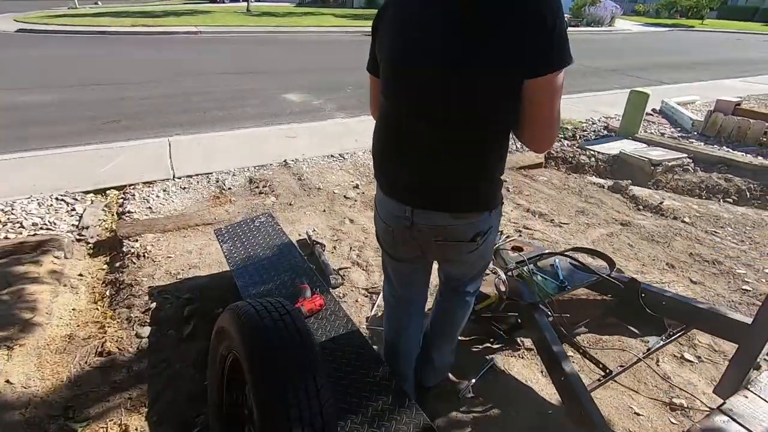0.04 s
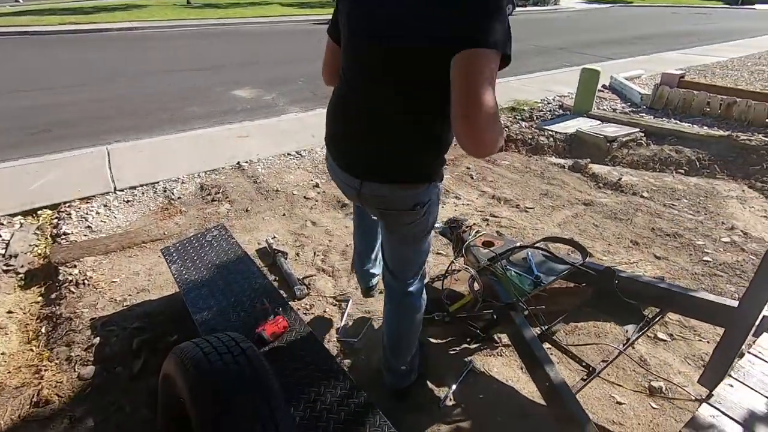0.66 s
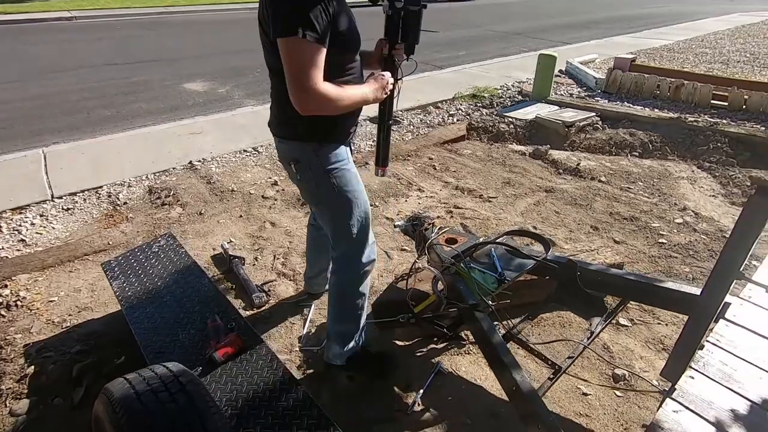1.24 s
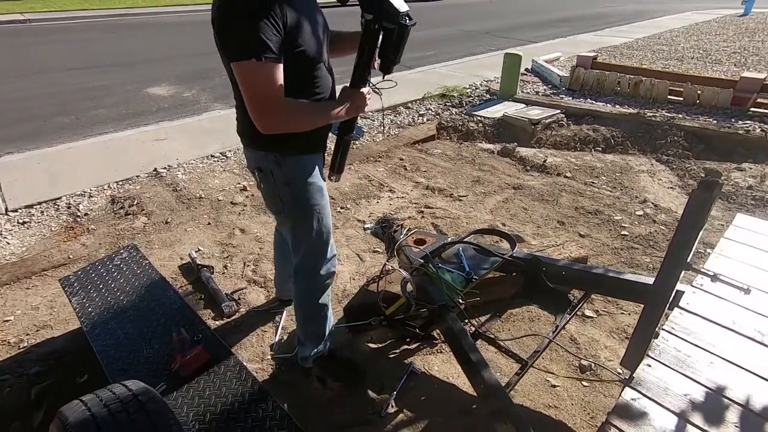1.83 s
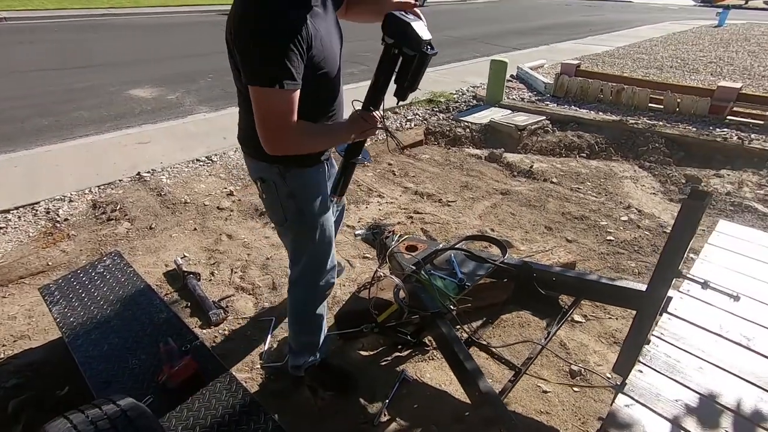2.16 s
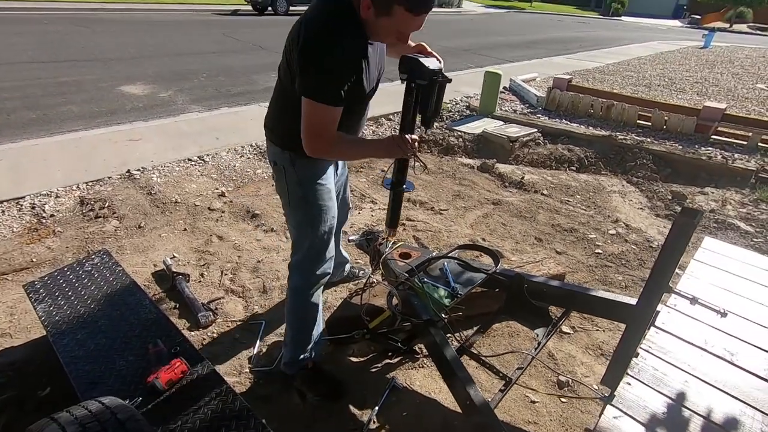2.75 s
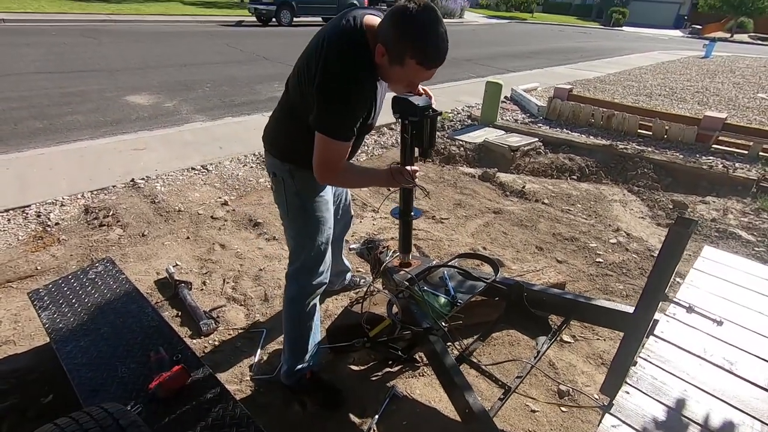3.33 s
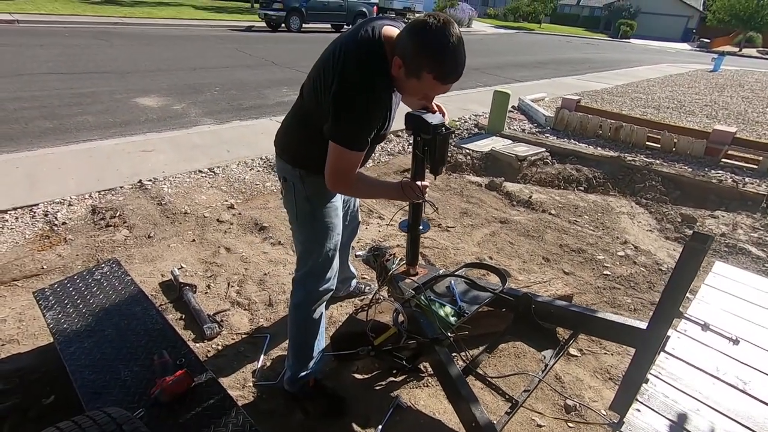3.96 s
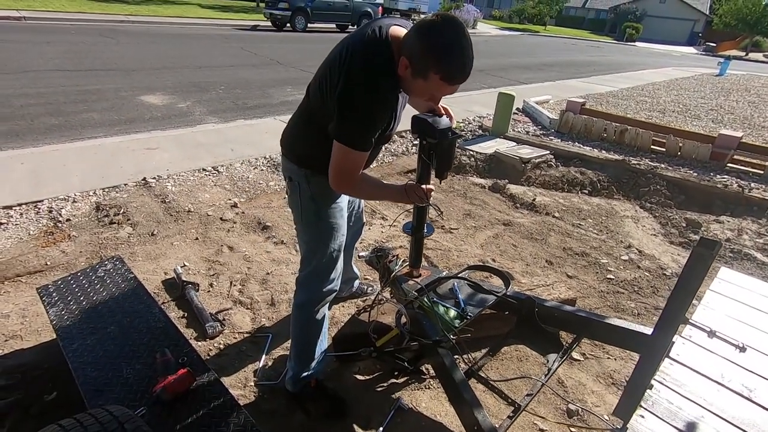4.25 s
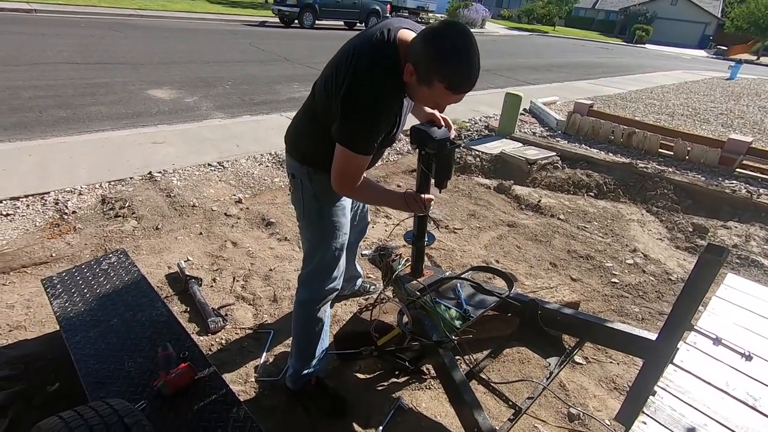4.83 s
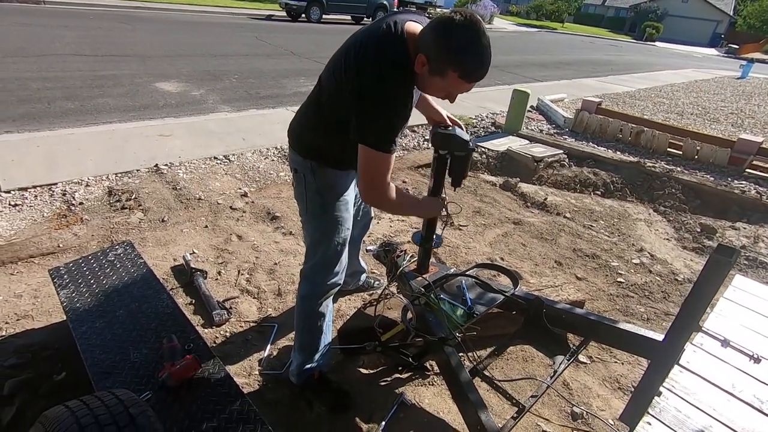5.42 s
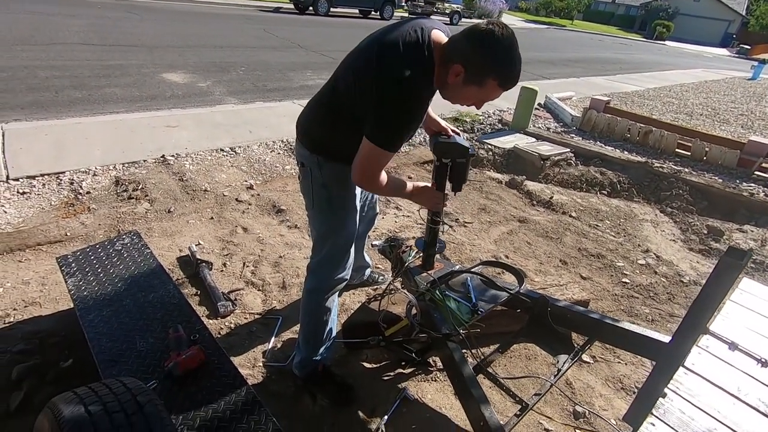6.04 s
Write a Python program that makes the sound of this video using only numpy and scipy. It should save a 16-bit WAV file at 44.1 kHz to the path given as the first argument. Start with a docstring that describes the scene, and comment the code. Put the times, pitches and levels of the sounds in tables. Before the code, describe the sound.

For the first second and a half, shoes scuff softly on dry, gritty dirt close to the microphone, with a few dull taps. A gust of wind bumps the microphone with a low rumble at about 1 second. The loose fittings of a steel trailer jack tick at 1.7 seconds, and another scuff and a few light clinks follow around 2.5 seconds. The jack's tube knocks against the trailer frame at 3.7 and 4.4 seconds, then gives a sharper double clank at 4.75. A knock and a short scrape come at 5.3 seconds, and at 5.6 the tube drops into place with a loud, rattling clank and a brief, thin ring. A last small scrape and tap follow just after 6 seconds. Faint distant traffic and a low motor hum continue throughout in the open yard.

```python
"""Shoes scuff grit close to the microphone as a man carries a steel trailer jack over a dirt yard.
Loose fittings tick. He works the jack's tube into the hole of a trailer tongue: it knocks on rim
and wall, scrapes, and drops home with a clank, tube and tongue ringing together.
Far off are traffic, a humming motor and a thin whine; a light wind rocks the microphone."""
import sys
import numpy as np
from scipy import signal
from scipy.fft import rfft, irfft
from scipy.io import wavfile
from scipy.ndimage import uniform_filter1d, map_coordinates

SR = 44100
rng = np.random.default_rng(int(sys.argv[2]) if len(sys.argv) > 2 else 0)


def store_wav(level_fs):
    """Save 16-bit WAV to argv[1]."""
    pcm = np.round(np.clip(np.atleast_2d(level_fs), -1, 1) * 32767)
    wavfile.write(sys.argv[1], SR, pcm.T.astype(np.int16))


N = 272670
TIME = np.arange(N) / SR


def from_db(db):
    """Decibels to gain."""
    return 10 ** (np.asarray(db) / 20)


def rms_one(x):
    """Scale to unit rms."""
    return x / np.sqrt(np.mean(x ** 2) + 1e-20)


def at_hz(table, hz, column=1):
    """Read a column of a table on a log-frequency axis."""
    table = np.array(table)
    return np.interp(np.log(hz + 1e-9), np.log(table[:, 0]), table[:, column])


def coloured(x, spectrum):
    """Filter a steady signal by rows of (f/Hz, level/dB); rms 1."""
    gain = from_db(at_hz(spectrum, np.fft.rfftfreq(N, 1 / SR)))
    return rms_one(irfft(rfft(x) * gain, N))


def drift(knots_per_s):
    """A smooth random curve of rms 1."""
    knots = rng.standard_normal(2048)
    return rms_one(map_coordinates(knots, [TIME * knots_per_s], order=2, mode="wrap"))


def band(x, low, high, order=2):
    """Causal band-pass, edges in Hz."""
    edges = [low, min(high, SR / 2 - 100)]
    return signal.sosfilt(signal.butter(order, edges, "band", fs=SR, output="sos"), x)


def add(out, at_s, sound):
    """Mix a sound in at the given time."""
    start = int(at_s * SR)
    out[start:start + len(sound)] += sound[:N - start]


def swells(rows, release=1.0):
    """Gain over time: each row grows exponentially to its peak and fades `release` times as slowly."""
    power = 0
    for peak_s, db, swell_s in rows:
        away = np.maximum(peak_s - TIME, (TIME - peak_s) / release) / swell_s
        power = power + (from_db(db) * np.exp(-np.minimum(away, 20))) ** 2
    return np.sqrt(power)


def dying_noise(db_at, t60_at, seconds):
    """Third-octave bands of noise, each dying at its own rate."""
    t = TIME[:int(seconds * SR)]
    edges = 70 * 2 ** (np.arange(25) / 3)
    white, out = rng.standard_normal((2, len(t))), 0
    for k, (low, high) in enumerate(zip(edges, edges[1:])):
        hz = np.sqrt(low * high)
        fade = from_db(-60 * t / t60_at(hz))
        band_rms = np.sqrt(np.mean(fade ** 2) * 2 * (high - low) / SR)
        out = out + from_db(db_at(hz)) * band_rms * rms_one(band(white[k % 2] * fade, low, high))
    return out


def ringing(modes, spread_db=1):
    """One blow on modes of (f/Hz, level/dB, t60/s), each caught with its own strength and sign."""
    t = TIME[:SR // 2]
    hz, db, t60 = np.transpose(modes)[:, :, None]
    strength = from_db(db + spread_db * rng.standard_normal(hz.shape)) * rng.choice([-1, 1], hz.shape)
    return np.sum(strength * from_db(-60 * t / t60) * np.sin(2 * np.pi * hz * t), axis=0)


def far_traffic(level_db=-62):
    """Distant streets merge into a wash whose level wanders slightly."""
    # spectrum of the wash: f/Hz, level/dB per Hz
    spectrum = [(40, -5), (60, -11), (90, -10.5), (125, -6.5), (160, -7.5), (250, -14.5), (330, -10.5),
                (480, -16), (700, -14), (1050, -21), (1650, -24.5), (3700, -31.5), (5700, -33.5),
                (9000, -39.5), (15500, -43)]
    return from_db(level_db + .5 * drift(3.28)) * coloured(rng.standard_normal(N), spectrum)


def far_motor():
    """A distant motor hums, each partial wavering in level and pitch."""
    # partials of the hum: f/Hz, level/dB rms, waver/Hz
    partials = [(115.8, -62, 0.947), (232, -76.5, 2.72), (347.8, -68, 1.1), (638, -77.5, 2.0)]
    hum = 0
    for hz, db, waver_hz in partials:
        amplitude = np.sqrt(2) * from_db(db + 1.2 * drift(6))
        phase = 2 * np.pi * np.cumsum(hz + waver_hz * drift(8)) / SR
        hum = hum + amplitude * np.sin(phase)
    return hum


def far_whine(hz=5650, width_hz=90):
    """A thin, distant band of noise swells and fades."""
    # height of the whine: t/s, level/dB, swell/s
    peaks = [(4.1, -81.5, 1.9)]
    whine = band(rng.standard_normal(N), hz - width_hz / 2, hz + width_hz / 2, order=1)
    return swells(peaks, release=0.69) * rms_one(whine)


def wind_on_microphone(breeze_db=-65, sway_db=-37.5, sway_follows=.58, sway_average_s=0.65):
    """Moving air drives a lumpy rumble and, more sluggishly, pressure swings below hearing."""
    # gusts at their height: t/s, level/dB, swell/s
    gusts = [(.02, -50.5, 0.021), (.22, -47.5, .04), (.45, -48, 0.28), (.81, -34.5, .035),
             (.98, -28, 0.024), (1.07, -41.5, 0.053), (1.2, -44.5, .035), (2.09, -43.5, 0.049),
             (3.0, -53, 0.08), (3.33, -43.5, 0.07), (3.7, -53.5, 0.16), (4.1, -54.5, 0.07),
             (6.18, -49, 0.12)]
    # spectrum of the rumble: f/Hz, level/dB per Hz
    spectrum = [(14, -3.5), (25, 8), (45, -2.5), (62, -8), (90, -16.5), (160, -29), (300, -74)]
    strength = np.hypot(from_db(breeze_db), swells(gusts, release=1.33))
    over_breeze = strength / from_db(breeze_db)
    gustiness = uniform_filter1d(over_breeze ** sway_follows, int(sway_average_s * SR) + 1)
    sway = rms_one(band(rng.standard_normal(N + SR), 2.5, 8, order=3)[SR:])
    rumble = coloured(rng.standard_normal(N), [(3.3, -35)] + spectrum)
    return from_db(sway_db) * gustiness * sway + strength * rumble


def yard_reflections(near, delay_s=.022, send_db=-30):
    """Ground, fence and houses scatter a weak, dull tail back to the microphone."""
    # scatter of the yard: f/Hz, relative level/dB, t60/s
    scatter = [(100, -7, .7), (300, -10, .65), (800, -17, .6), (2000, -27, .5), (4500, -29, .5),
               (8000, -35, .35), (15000, -39, .3)]
    tail = dying_noise(lambda hz: at_hz(scatter, hz), lambda hz: at_hz(scatter, hz, column=2), 1.0)
    out = np.zeros(N)
    add(out, delay_s, from_db(send_db) * signal.fftconvolve(near, tail)[:N])
    return out


def friction(push, spectrum, slips_per_s, size_db, clump_db):
    """Many tiny slips of uneven size, bunched in clumps, as loud as the push behind them."""
    slips = (rng.random(N) < slips_per_s / SR) * rng.choice([-1, 1], N)
    sizes = from_db(size_db * np.minimum(rng.exponential(1, N), 4))
    clumps = from_db(clump_db * drift(130))
    return coloured(slips * sizes * clumps, spectrum) * push


def shoe_scuffs(gain_db=1.0):
    """Soles drag over dry dirt near the microphone, and the grit slips under them."""
    # hardest push of each scuff: t/s, relative level/dB, swell/s
    scuffs = [(.02, -60.5, .03), (.115, -61.5, 0.028), (.225, -63.5, 0.044), (.48, -64, 0.21),
              (.885, -59.5, 0.023), (.98, -60, 0.075), (1.065, -55.5, 0.087), (1.25, -66, 0.24),
              (1.455, -65, 0.011), (2.40, -63.5, 0.097), (2.452, -48, 0.026)]
    # spectrum of the grit: f/Hz, level/dB per Hz
    grit = [(150, -4.5), (400, -6), (750, -3.5), (1100, -4), (1800, -8), (4300, -16.5), (6700, -23),
            (9000, -22), (11000, -32), (15500, -42)]
    push = from_db(gain_db) * swells(scuffs, release=0.91)
    return friction(push, grit, slips_per_s=2400, size_db=2.0, clump_db=1.5)


def dull_taps(ground_db=-7, ground_delay_s=.005, crumble=0.15, crumble_s=0.004):
    """Dead contacts close by: one push, a little crumbling, and a reflection from the ground."""
    # short contacts: t/s, level/dB before the band-pass, centre f/Hz
    contacts = [(.119, -25, 745), (0.2257, -19.5, 990), (0.2883, -29.5, 1210), (.529, -39, 2200),
                (.639, -41.5, 2000), (1.052, -37, 1090), (1.069, -33, 1010), (2.248, -28, 880),
                (2.457, -46, 5030), (2.483, -31, 1490), (2.493, -30, 1380), (4.4298, -24.5, 1370),
                (5.221, -26, 1200), (5.2577, -27.5, 1370), (5.289, -32, 900), (5.5766, -8, 2160),
                (6.103, -23.5, 766)]
    out, t = np.zeros(N), TIME[:SR // 10]
    for at_s, db, hz in contacts:
        envelope = np.exp(-t / crumble_s) * (1 - np.exp(-t * hz / 2))
        force = crumble * rng.standard_normal(len(t)) * envelope
        force[0] += 2   # the push itself
        tap = from_db(db) * band(force, hz * .5, hz * 1.65, order=3)
        add(out, at_s, tap)
        add(out, at_s + ground_delay_s, from_db(ground_db) * tap)
    return out


def fitting_ticks(focus_db_per_octave=18, crack_db=2, crack_s=0.0018, rise_s=0.00073):
    """The jack's loose fittings touch: a tiny crack, and modes near the struck pitch ring most."""
    # touches: t/s, level/dB, f/Hz struck hardest, t60/s of damping by what the fitting rests on
    touches = [(1.612, -61, 8000, .03), (1.668, -43.5, 2070, 0.018), (1.668, -46, 3440, 0.013),
               (1.668, -55, 7700, .04), (2.326, -58, 6700, .4), (2.523, -44, 6960, 0.19),
               (2.522, -44, 3000, 0.065), (2.540, -55, 8450, 0.11), (2.630, -54, 2800, 0.069),
               (2.630, -56, 7000, 0.061), (2.847, -52, 5500, .02), (4.583, -53.5, 7600, 0.15),
               (5.604, -42.5, 8750, 1.5), (5.679, -50.5, 5900, 1.8), (6.113, -47, 8000, .05)]
    # modes of a fitting: f/Hz, relative level/dB, t60/s
    fitting = [(1910, 2, 0.022), (2490, -3, 0.12), (5760, -18.5, 0.5), (6880, -16, 0.11), (8200, -5, 0.018),
               (8130, -18, 0.25), (8800, -17, 0.38), (9850, -17, .28)]
    out, t = np.zeros(N), TIME[:SR // 2]
    for at_s, db, struck_hz, damping_t60 in touches:
        modes = [(hz, mode_db - focus_db_per_octave * abs(np.log2(hz / struck_hz)), t60)
                 for hz, mode_db, t60 in fitting]
        ring = ringing(modes) * from_db(-60 * t / damping_t60)
        burst = rng.standard_normal(len(t)) * np.exp(-t / crack_s)
        crack = from_db(crack_db) * band(burst, struck_hz * 0.66, struck_hz * 1.23)
        add(out, at_s, from_db(db) * (ring + crack) * (1 - np.exp(-t / rise_s)))
    return out


def tube_scrapes():
    """Steel rasps on steel as the tube slides in the hole."""
    # hardest push of each slide: t/s, level/dB, swell/s
    slides = [(5.29, -59.5, 0.054), (5.775, -66, 0.033), (6.113, -51, 0.016), (6.17, -57, 0.042)]
    # spectrum of the rasp: f/Hz, level/dB per Hz
    rasp = [(200, -1), (600, -1), (2300, -9.5), (4400, -10.5), (8500, -14.5), (11000, -20), (15500, -27)]
    return friction(swells(slides), rasp, slips_per_s=3800, size_db=-2.0, clump_db=2.1)


def tube_knocks(grip_t60=0.3):
    """Close up, each knock shakes the frame and rings the steel by where it lands; hands damp the ring."""
    # tube against tongue: t/s, place, contact level/dB at 800 Hz, relative to that thud/dB, clang/dB
    # and edge/dB; then frame t60/s, ring level/dB, rise/s
    blows = [(3.6572, "rim", -26, 0, -13, -39, 0.088, -50.5, 0.001),
             (3.6609, "rim", -27, -3, -3.5, -20, .14, -58, 0.00068),
             (3.6762, "wall", -42, 11.5, -19, -35, 0.11, -69, .0007),
             (4.4276, "rim", -29.5, 0.5, -18, -25, 0.1, -49, 0.00023),
             (4.746, "wall", -18, -0.5, -34, -24, 0.046, -70, 0.0018),
             (4.7512, "wall", -23, 2, 3.5, -4, 0.1, -39, 0.0018),
             (4.7739, "wall", -27, -7, 4.5, -0.5, 0.15, -37.5, 0.00044),
             (5.3021, "rim", -28, 4, -2.5, -20.5, 0.13, -45.5, 0.00054),
             (5.3185, "rim", -34.5, -18, -33, -8.5, 0.11, -70, 0.0013),
             (5.5662, "seat", -36, -20, -12, -1, 0.056, -48.5, 0.0019),
             (5.5737, "seat", -18, 0, 1.5, -8, 0.09, -36, 0.00037),
             (5.5910, "seat", -27.5, -3, 6.5, -5.5, 0.15, -43.5, 0.00053),
             (5.6065, "seat", -27.5, 6, 0.5, -16, 0.14, -71, 0.00084)]
    # the frame's countless close modes: f/Hz, relative level/dB, factor on the blow's t60
    frame_modes = [(73.4, -4.5, 1.5), (128, -9, 4.4), (244, -2.5, 2.1), (480, -5.5, 2.3), (720, 0, 1.27),
                   (1400, -3.5, 1.04), (2400, -6.5, 1.04), (3750, -2.5, 0.86), (5160, -5, 0.92),
                   (8200, -3, 0.69), (11400, -17.5, 0.66), (15000, -26, 0.87)]
    # modes of tube and tongue together: f/Hz, t60/s, relative level/dB struck on rim, wall, seat
    steel_modes = [(184, .3, -16, -8, -16), (236, .25, -16, -3, -12), (248, .33, -16, 3, -9),
                   (637, .22, -1, -10, -10), (657, .25, -14, -12, -2), (802, .2, -2, -6, 0),
                   (913, .2, -14, -20, -5), (1055, .22, -12, -14, -2), (1320, .18, -10, -4, -6),
                   (1480, .15, -14, -1, -8), (1745, .19, -16, -8, 4), (1965, .18, -9, -8, -6),
                   (2048, .15, -3, -16, -12), (2096, .17, -14, -14, 1), (2140, .15, -6, -14, -9),
                   (2309, .15, -8, -14, -4), (2417, .14, -9, -4, -12), (2514, .14, -12, -1, -4),
                   (2847, .13, -3, -20, -20), (2900, .17, -18, -6, -8), (3418, .16, -10, -16, -8),
                   (3812, .12, -14, -4, -3), (3984, .12, -14, -1, -4), (4172, .12, -20, 1, -2),
                   (4408, .15, -14, -5, -7), (5124, .12, -26, -6, -12), (5412, .13, -26, -4, -6),
                   (5589, .15, -26, -11, -4), (6166, .15, -28, -14, -7), (7900, .11, -28, -11, -18),
                   (8190, .1, -28, -11, -16)]
    # parts of the hole, in the order of those columns
    places = ["rim", "wall", "seat"]
    out, t = np.zeros(N), TIME[:SR // 2]
    for at_s, place, db, thud_db, clang_db, edge_db, t60, ring_db, rise_s in blows:
        contact = [(250, thud_db), (800, 0), (3000, clang_db), (9000, edge_db)]   # f/Hz, level/dB
        frame = dying_noise(lambda hz: db + at_hz(contact, hz) + at_hz(frame_modes, hz),
                            lambda hz: t60 * at_hz(frame_modes, hz, column=2), seconds=.5)
        modes = [(hz, ring_db + place_db[places.index(place)], mode_t60)
                 for hz, mode_t60, *place_db in steel_modes]
        ring = ringing(modes) * from_db(-60 * t / grip_t60)
        add(out, at_s, (frame + ring) * (1 - np.exp(-t / rise_s)))
    return out


def scene():
    """One microphone in the yard: the work close by, wind on the capsule, the neighbourhood far off."""
    near = shoe_scuffs() + tube_scrapes() + tube_knocks() + fitting_ticks() + dull_taps()
    far = far_traffic() + far_motor() + far_whine()
    return (near + yard_reflections(near) + wind_on_microphone() + far)[None]


def record(dry):
    """The treble is cut steeply above 15.7 kHz."""
    return signal.sosfilt(signal.ellip(12, .1, 80, 15700, fs=SR, output="sos"), dry)


dry = scene()
out = record(dry)
store_wav(out)
```